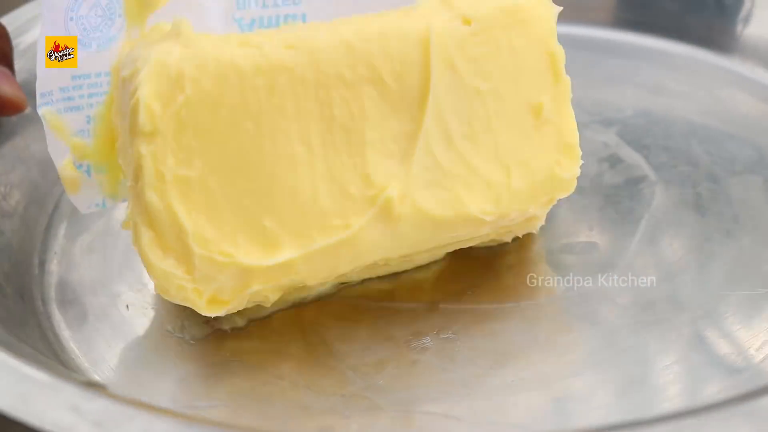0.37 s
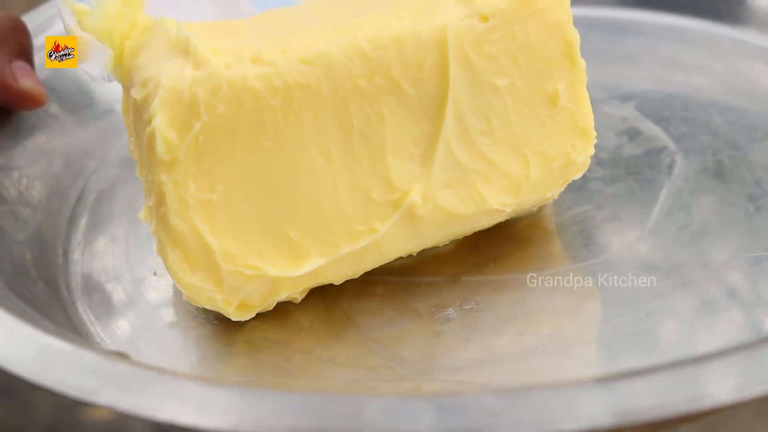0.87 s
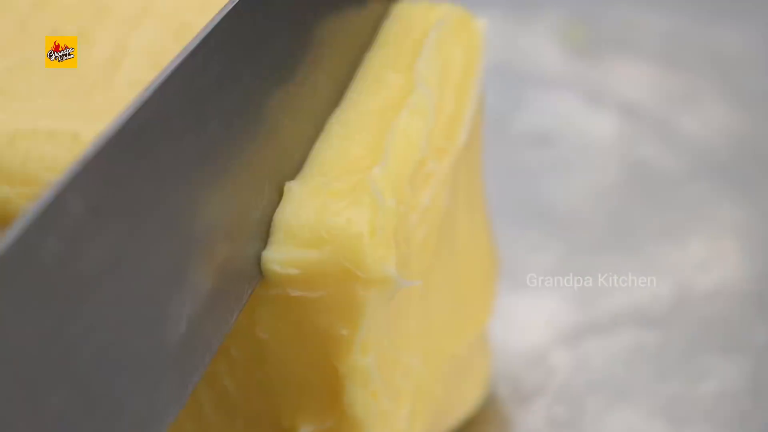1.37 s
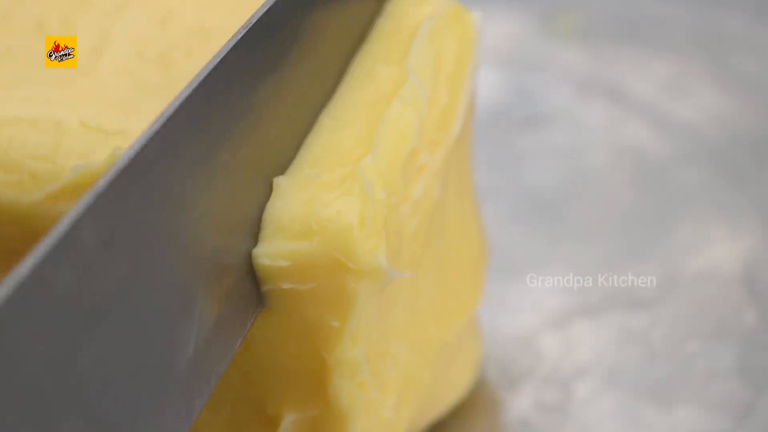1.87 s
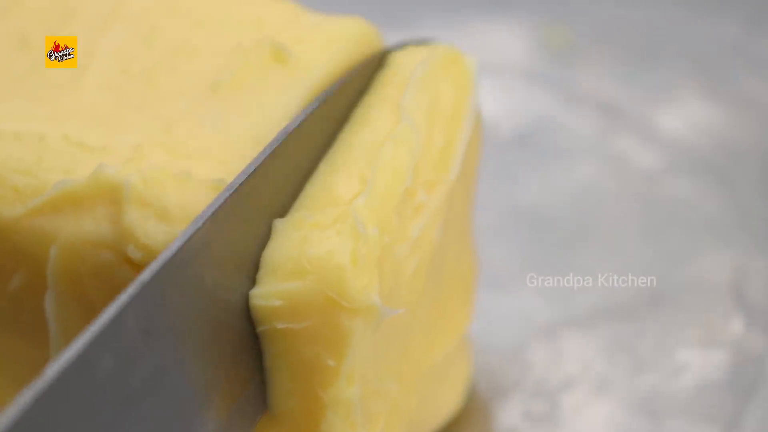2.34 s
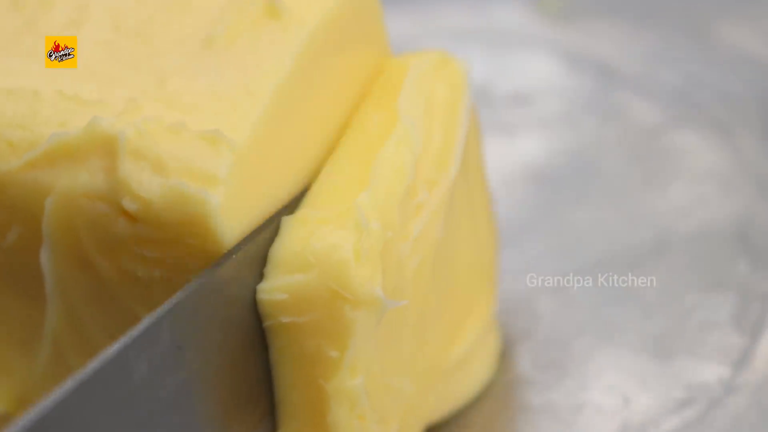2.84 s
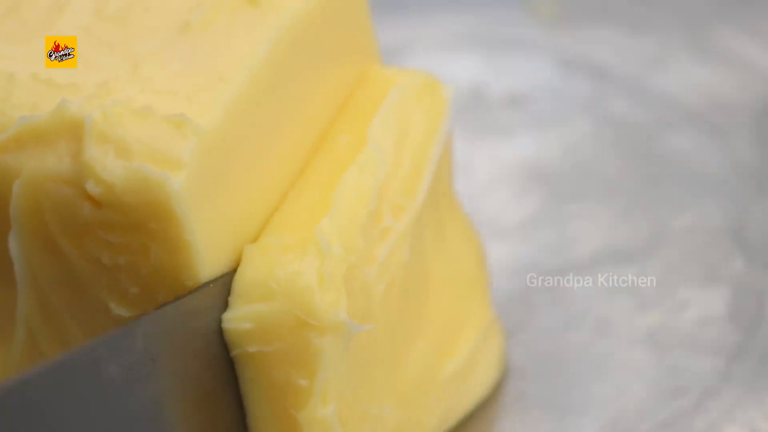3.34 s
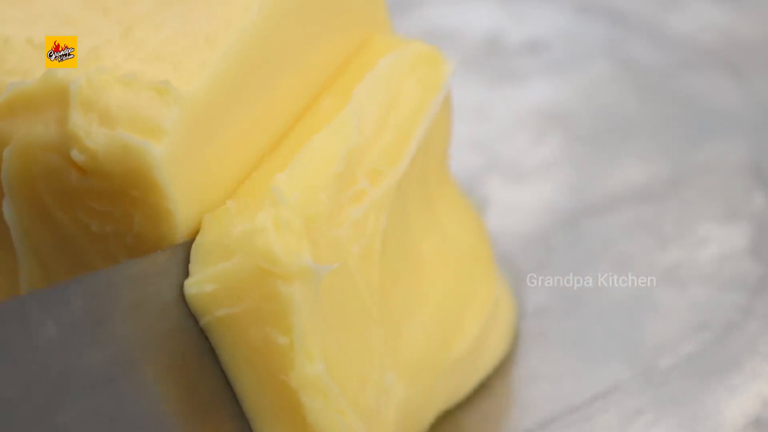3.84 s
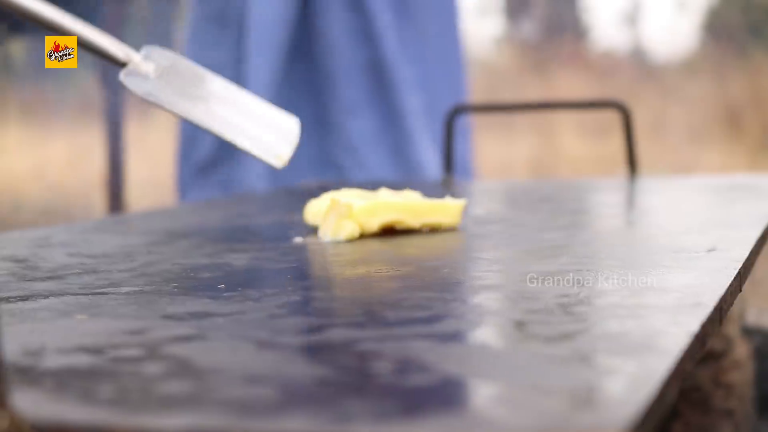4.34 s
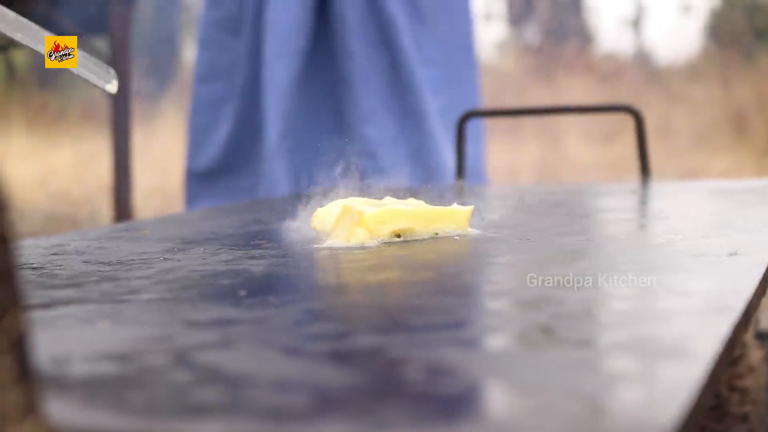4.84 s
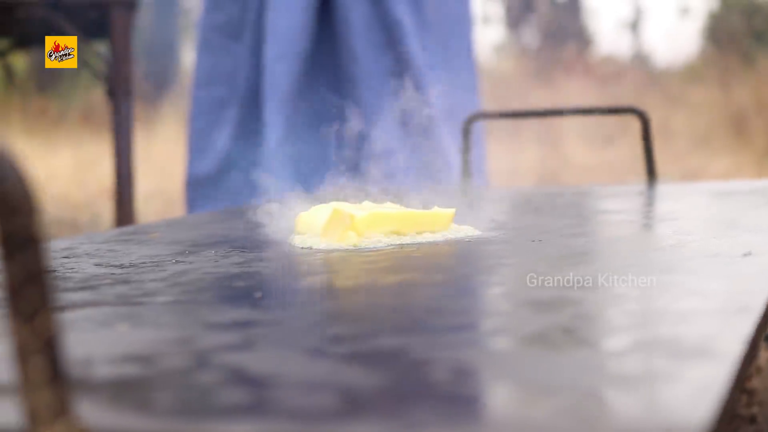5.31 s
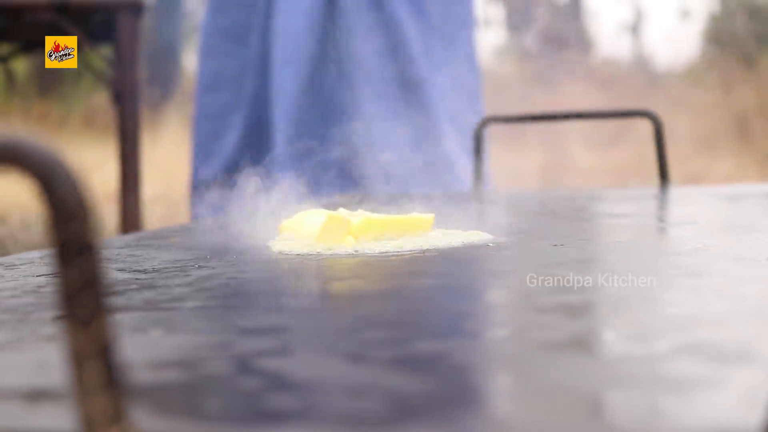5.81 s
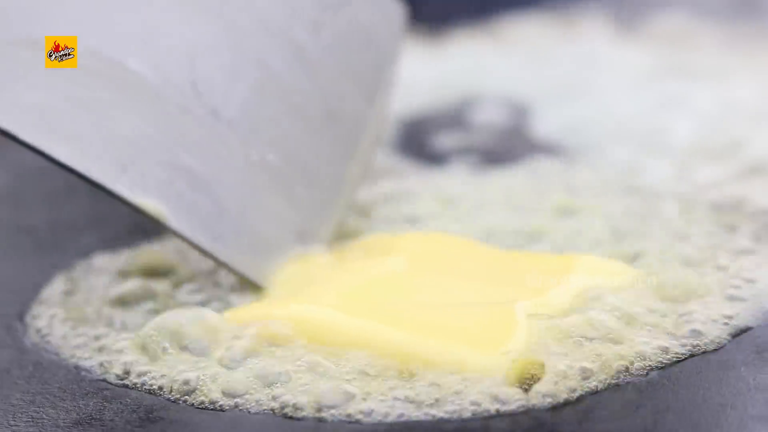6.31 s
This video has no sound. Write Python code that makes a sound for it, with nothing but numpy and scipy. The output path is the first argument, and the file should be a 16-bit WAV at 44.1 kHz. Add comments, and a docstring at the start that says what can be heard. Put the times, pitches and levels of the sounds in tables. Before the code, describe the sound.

Outdoors, closely miked in stereo. From 0 to 1.4 s a waxed wrapper crackles in dense, crisp, uneven snaps, busiest before 0.95 s and then thinning, while low wind buffets thump mostly on the right. At 1.4 s it cuts to a quiet breeze with leafy hiss and a faint distant engine drone until 3.3 s. Small dry ticks and very faint rising knife squeaks appear; a plate knocks dully from 2.5 s, more firmly at 2.85, with one very loud short clank at 3.17 and a faint knock at 4.14. A wavering bird whistle drops in pitch at about 3.1, 3.35, 3.65, 3.9 and 4.2 s, echoing softly. At 4.34 s bright, dense butter sizzling starts abruptly over fluttering fire rumble and low puffs; the passage restarts at 5.34. At 6.2 s the frying turns closer and fuller, with a hollow griddle hum under a scraper, until the end.

```python
"""A waxed wrapper crackles off a block of butter: creases slip and ring the sheet as wind buffets the microphone.
Then a knife squeaks through the block (stick-slip tones) and knocks on a steel plate (ringing modes) as a
whistled bird calls and a few small dry ticks fall. Next the butter sizzles on a griddle over a fire: dense clicks
for bursting water beads, rumble and puffs for the flames; its first second starts over once. Last, a close view of
the frying, where the griddle hums under a scraper. A breeze bed (banded noise) lies under wrapper and knife."""
import sys
import numpy as np
from scipy import signal
from scipy.io import wavfile

SR = 44100
rng = np.random.default_rng(int(sys.argv[2]) if len(sys.argv) > 2 else 0)


def int16_out(signal):
    """Quantize to a 16-bit WAV file."""
    q = np.round(np.clip(np.atleast_2d(signal).T, -1, 1) * 32767)
    wavfile.write(sys.argv[1], SR, q.astype(np.int16))


def gain_from_db(level_db):
    """Convert decibel levels to linear amplitude factors (20 dB per decade)."""
    decades = np.asarray(level_db, float) / 20
    return 10 ** decades


N = 283563

# where the knife, griddle and close view begin, and how long the repeated griddle passage is (s)
KNIFE_S, GRIDDLE_S, CLOSE_S, REPEAT_S = 1.405, 4.34, 6.205, 1.001
# stereo likeness of frying and fire: f/Hz, likeness of left and right (0-1)
FRY_LIKENESS = [(60, 0.46), (130, 1), (290, 0.87), (640, 0.75), (1410, 0.8), (3100, 0.95), (6820, 0.76),
                (15000, 0.35)]
# stereo balance of frying and fire: f/Hz, left over right/dB
FRY_BALANCE = [(60, 4), (180, -1), (550, 1.5), (1650, -1), (4970, -2.5), (15000, -5.5)]


def rms_one(x):
    """Scale to rms 1."""
    return x / np.sqrt(np.mean(x ** 2) + 1e-20)


def in_time(rows):
    """Read every column of a breakpoint curve at each sample."""
    s, *columns = np.transpose(rows)
    return [np.interp(np.arange(N) / SR, s, c) for c in columns]


def at_hz(points, hz):
    """Read a spectrum on a log frequency axis."""
    f, value = np.transpose(points)
    return np.interp(np.log(hz), np.log(f), value)


def sides(db):
    """Left and right gains for a left-over-right difference in dB; negative leans right."""
    return gain_from_db(np.array([db / 2, -db / 2]).reshape(2, -1))


def between(x, start_s, end_s):
    """Keep a sound between two times only, in stereo."""
    out, a, b = np.zeros((2, N)), round(start_s * SR), min(round(end_s * SR), N)
    out[:, a:b] = x[..., a:b]
    return out


def drift(rate_hz):
    """Slow random wander of rms 1: lowpassed noise made at one value per 40 samples."""
    r = np.exp(-80 * np.pi * rate_hz / SR)
    slow = signal.lfilter([1], [1, -2 * r, r * r], rng.standard_normal(N // 40 + 2002))[2000:]
    return np.interp(np.arange(N) / 40, np.arange(len(slow)), rms_one(slow))


def resonance(x, hz, width_hz):
    """One resonant peak of gain 1."""
    r = np.exp(-np.pi * width_hz / SR)
    poles = [1, -2 * r * np.cos(2 * np.pi * hz / SR), r * r]
    return signal.lfilter([(1 - r * r) / 2, 0, (r * r - 1) / 2], poles, x)


def grains(per_s, spread_db, shape):
    """Random clicks of either sign, a few of them much larger, at rms 1."""
    sizes = gain_from_db(spread_db * np.minimum(rng.exponential(1, shape), 5)) * rng.choice([-1, 1], shape)
    return rms_one(sizes * (rng.random(shape) < per_s / SR)) + 1e-18


def banded(source, spectrum, likeness, balance, patchy_db, gain_db, span):
    """Quarter-octave stereo bands inside a span, each patchy on its own; gain_db(hz) moves a band in time."""
    a, b = round(span[0] * SR), min(round(span[1] * SR), N)
    out, edges = np.zeros((2, N)), 25 * 2 ** np.arange(0, 9.6, .25)
    for k, (low, high) in enumerate(zip(edges, edges[1:])):
        hz = np.sqrt(low * high)
        band = signal.butter(2, [low, high], "band", fs=SR, output="sos")
        mid, side = signal.sosfilt(band, source[k % 2][:, a:b])
        alike = np.clip(at_hz(likeness, hz), -1, 1)
        level_db = at_hz(spectrum, hz) + gain_db(hz) + patchy_db * drift(16.6)
        gain = gain_from_db(level_db)[a:b] * sides(at_hz(balance, hz))
        out[:, a:b] += gain * (np.sqrt(1 + alike) * mid + np.sqrt(1 - alike) * side * [[1], [-1]])
    return out


def add(out, s, burst):
    """Mix a short burst in at a time."""
    at = round(s * SR)
    out[:, at:at + burst.shape[-1]] += burst[..., :N - at]


def wrapper_snaps():
    """Each crease buckles in a few quick slips that ring the waxed sheet; duller snaps ring longer."""
    # loudest snaps: t/s, body peak level/dB, crease pitch f/Hz, treble peak over body/dB
    snaps = [(.033, -16.5, 1650, -14), (0.042, -15.5, 2840, -10), (.064, -14, 2530, 3.5),
             (.092, -13.5, 1480, -7), (0.107, -13.5, 2100, -7), (0.117, -20, 1770, 3),
             (.139, -16, 1620, -15), (0.148, -8, 2750, 0.5), (.16, -11, 2490, 6.5),
             (0.166, -4.5, 2790, -10), (0.172, -11.5, 1620, -5), (.177, -16, 1770, 4),
             (0.187, -18, 1310, -26), (.2, -27, 1670, -8), (.213, -14, 3150, -8), (.221, -18, 2500, 2.5),
             (.247, -5, 2560, 2.5), (.265, -17, 1890, -5), (.272, -9, 1600, -9), (0.289, -11, 2560, -11),
             (.307, -9.5, 1550, -13), (.335, -10.5, 2100, -2.5), (.342, -15.5, 1770, -4),
             (.349, -8.5, 1800, -5.5), (0.364, -19.5, 1870, -3), (.387, -18, 1930, -14),
             (.394, -15, 1810, -4), (.403, -26, 1880, 6.5), (.426, -18.5, 1530, -18),
             (.459, -14.5, 1980, -8), (.476, -6.5, 1860, -0.5), (0.484, -12, 1050, -12),
             (.494, -14.5, 2490, -14), (.499, -15, 1360, -11), (0.517, -11, 1730, -4.5),
             (.531, -19, 1380, -18), (0.545, -15, 1290, -17), (0.553, -20, 1400, -1), (0.557, -20, 1810, 3),
             (0.58, -16.5, 1540, -8), (0.592, -20.5, 1820, 2), (.617, -2.5, 1650, -4), (.643, -28, 1200, 3),
             (.673, -16, 2030, -5), (.688, -12, 1860, -3), (0.696, -28, 1430, -16), (0.705, -30, 990, -10),
             (.72, -13, 1960, -7), (0.725, -4.5, 1030, 0.5), (.745, -8.5, 2110, 1), (.766, -18.5, 2040, 4),
             (0.779, -17.5, 1450, -7), (.787, -24.5, 1900, -5), (.81, -21.5, 1470, -27),
             (.82, -16.5, 2200, -5), (.836, -21.5, 1100, -14), (.843, -8, 1380, -7), (0.847, -15, 1380, -5),
             (0.856, -45, 1990, -20), (.864, -4.5, 2230, 0), (.878, -11.5, 1210, 3.5),
             (.887, -18, 2620, 11.5), (.921, -14, 2060, 1.5), (.925, -12.5, 2060, -6),
             (.932, -14.5, 1050, -2), (.948, -15, 1210, -4), (0.952, -15.5, 1200, -16),
             (0.968, -35, 1400, -9), (0.989, -21, 2050, -4.5), (.995, -18.5, 1550, -18),
             (1.009, -19, 1560, -28), (1.039, -22, 1620, -11), (1.072, -15.5, 3240, -2.5),
             (1.084, -19.5, 1800, -10), (1.094, -24.5, 1270, -20), (1.125, -32, 2410, -13),
             (1.208, -27.5, 1820, -14), (1.215, -24, 1440, -21), (1.233, -24, 2080, -8),
             (1.248, -22.5, 2730, 0.5), (1.263, -26.5, 2930, -8), (1.276, -33, 3030, -17),
             (1.283, -28.5, 2420, -2), (1.335, -24, 1310, -23), (1.368, -11, 2780, -5.5)]
    even_t60_s, longer_per_dull_db, ring_scatter_db = 0.0082, 0.45, 3.5   # ring time when body and treble match
    out, t = np.zeros((2, N)), np.arange(1500) / SR
    dull = signal.butter(3, [300, 5200], "band", fs=SR, output="sos")
    for s, db, hz, treble_db in snaps:
        ring_luck, pan_luck = rng.standard_normal(2)
        t60 = even_t60_s * gain_from_db(ring_scatter_db * ring_luck - longer_per_dull_db * treble_db)
        envelope = np.minimum(t / 0.00067, 1) * gain_from_db(-60 * t / max(t60, .003))
        slips = rng.standard_normal((3, t.size)) ** 3 * envelope   # cubing leaves a few large slips
        # one shared part plus one for each side; the treble is wider
        wide = slips[0] + 0.73 * slips[1:]
        narrow = slips[0] + 0.22 * slips[1:]
        body = resonance(narrow, hz, 0.5 * hz) + 0.047 * resonance(narrow, 2.5 * hz, hz)
        body = signal.sosfilt(dull, body + 0.5 * resonance(narrow, 910, 690))
        treble = resonance(wide, rng.uniform(6160, 8000), 1630) + 0.16 * resonance(wide, 9700, 2700)
        snap = body / np.abs(body).max() * sides(-1.5)
        snap = snap + gain_from_db(treble_db) * treble / np.abs(treble).max() * sides(-3)
        add(out, s, gain_from_db(db) * snap * sides(2.0 * pan_luck))
    return out


def wrapper_crackle():
    """Smaller creases give way in clumps of clicks that follow the handling."""
    # handling: t/s, fine crackle level/dB
    handling = [(0.0, -35.5), (.1, -30), (.5, -38), (.85, -35.5), (1.044, -46), (1.192, -52.5), (1.4, -67)]
    # crackle colour: f/Hz, relative level/dB
    colour = [(180, -38), (300, 3), (494, 0), (1080, 11), (2740, 0.5), (5610, -14), (6620, -13),
              (10400, -14.5), (16000, -45.5)]
    clumps = grains(350, 4.0, (1, 2, N)).repeat(2, axis=0) * gain_from_db(4.5 * drift(60))
    level_db, = in_time(handling)
    likeness, balance = [(600, 1.0), (15000, 0.091)], [(300, -3.5), (15000, 4)]
    return banded(clumps, colour, likeness, balance, 2.2, lambda hz: level_db, (0, KNIFE_S))


def knife_knocks():
    """A few ms of rattling contact strike the plate's decaying modes, unevenly from knock to knock."""
    # knocks: t/s, peak level/dB, hardness cut f/Hz, rattle time to -40 dB/s
    knocks = [(2.516, -28.5, 486, 0.0056), (2.646, -34.5, 1500, .005), (2.719, -35, 2000, 0.011),
              (2.845, -17, 5440, 0.009), (3.069, -28.5, 3000, 0.0053), (3.1742, -1, 5100, 0.018),
              (3.331, -30.5, 5000, 0.015), (3.481, -32, 6000, 0.0031), (4.137, -32.5, 2510, 0.014)]
    # steel plate modes: f/Hz, level/dB, t60/s
    plate = [(307, 8, 0.027), (452, -11.5, 0.049), (686, -17.5, 0.1), (886, 2, 0.0092), (1210, -7, 0.032),
             (1380, -12, 0.039), (1774, -24, 0.27), (1800, 2, 0.019), (2670, -10.5, 0.033),
             (3980, -16, 0.05), (4600, -27, 0.027), (5866, -12, 0.05), (6570, -11, 0.028),
             (7600, -10, 0.019), (8320, -5.5, 0.025)]
    out, t = np.zeros((2, N)), np.arange(6000) / SR
    for s, db, cut_hz, rattle_s in knocks:
        contact = rng.standard_normal(t.size) * gain_from_db(-40 * t / rattle_s)
        hardness = signal.butter(1, [300, min(cut_hz, 18000)], "band", fs=SR, output="sos")
        softening = signal.butter(1, min(3.0 * cut_hz, 18000), fs=SR, output="sos")
        contact = signal.sosfilt(softening, signal.sosfilt(hardness, contact))
        ring = 14.0 * signal.lfilter([1, -1], [1, -.95], contact)   # the contact heard directly
        for hz, mode_db, t60 in plate:
            r, w = gain_from_db(-60 / (t60 * SR)), 2 * np.pi * hz / SR
            struck = signal.lfilter([0, np.sin(w)], [1, -2 * r * np.cos(w), r * r], contact)
            ring = ring + gain_from_db(mode_db + rng.normal(0, 1.5)) * struck
        ring = signal.sosfilt(signal.butter(3, [230, 13000], "band", fs=SR, output="sos"), ring)
        add(out, s, gain_from_db(db) * ring / np.abs(ring).max() * sides(-.5))
    return out


def knife_squeaks():
    """The blade sticks and slips in the fat: four rising partials of uneven strength."""
    # squeaks: t/s, length/s, starting f/Hz, fundamental level/dB, gain per overtone/dB
    squeaks = [(1.711, 0.037, 1034, -47.5, -16), (2.409, 0.1, 1617, -48.5, -14),
               (2.461, 0.04, 1220, -46, -25), (2.715, 0.028, 678, -40.5, -13),
               (2.806, 0.026, 1025, -46, 3.5), (2.788, 0.11, 1023, -45, -40), (3.363, .085, 1870, -48, -30),
               (3.37, .07, 1560, -51, -30)]
    out = np.zeros((2, N))
    for s, length, hz, db, tilt_db in squeaks:
        u = np.arange(round(length * SR)) / SR
        uneven = gain_from_db(6.9 * drift(79)[:u.size])
        phase = 2 * np.pi * hz * u * (1 + 0.24 * u)
        tone = sum(gain_from_db(tilt_db * k) * np.sin((k + 1) * phase) for k in range(4))
        add(out, s, gain_from_db(db) * tone * uneven * np.sin(np.pi * u / length))
    return out


def frying(db, fizz_db, colour, span):
    """Thousands of water beads burst in the fat each second; fizz_db lifts the treble above 4 kHz."""
    beads = grains(9000, 1.63, (2, 2, N)) * gain_from_db(0.86 * drift(92))
    spit = grains(28, 3.2, N)   # larger pops, heard in all bands at once
    return banded(beads + .12 * spit, colour, FRY_LIKENESS, FRY_BALANCE, 0.43,
                  lambda hz: db + fizz_db * np.clip(np.log2(hz / 4000), 0, 1), span)


def fizz():
    """Gain in dB of the finest fizz: it starts strong, settles, and thins for a moment."""
    t = np.arange(N) / SR
    first_db = 4.5 * np.exp(-np.abs(t - GRIDDLE_S) / 0.043)
    thins_db = -3.5 * np.exp(-((t - 5.01) / .12) ** 2)
    return first_db + thins_db


def fire():
    """Flames rumble as fluttering low noise, and puff: low swelling tones that ring the griddle at 400 Hz."""
    # rumble colour: f/Hz, relative level/dB
    colour = [(15, -36), (25, 3), (124, -3), (180, -1.5), (292, -7), (420, -11), (650, -16), (1000, -11),
              (2000, -90)]
    # puffs under the griddle: t/s, level/dB, low pitch f/Hz, griddle ring over the low tone/dB
    puffs = [(4.34, -35.5, 234, -2), (4.499, -34, 78.1, -17), (4.699, -44, 129, 7), (4.755, -43.5, 130, 13),
             (4.854, -33.5, 182, -7), (4.929, -33, 125, -2.5), (4.995, -30, 160, -9),
             (5.024, -30, 59.2, -28), (5.048, -30.5, 188, -7), (5.12, -35, 75.4, -3.5),
             (5.154, -33, 90.7, -16), (5.22, -30, 181, -2), (5.299, -31, 172, -4.5)]
    flutter_db = 1.5 * drift(16)
    out = banded(rng.standard_normal((2, 2, N)), colour, FRY_LIKENESS, FRY_BALANCE, 1.33,
                 lambda hz: -27.5 + flutter_db, (GRIDDLE_S, N / SR))
    t = np.arange(3000) / SR
    swell = t / 0.0088 * np.exp(1 - t / 0.0057)
    for s, db, hz, ring_db in puffs:
        puff = np.sin(2 * np.pi * hz * t) + gain_from_db(ring_db) * np.sin(2 * np.pi * 400 * t)
        add(out, s, gain_from_db(db) * swell * puff)
    return out


def griddle_hum():
    """The scraper's rubbing noise drives the sheet's low resonances."""
    # hum resonances: f/Hz, width/Hz, rms level/dB
    modes = [(382, 45, -38.5), (773, 24, -53)]
    rub, hum = rng.standard_normal(N), 0
    for hz, width_hz, db in modes:
        hum = hum + gain_from_db(db) * rms_one(resonance(resonance(rub, hz, width_hz), hz, 2 * width_hz))
    return between(hum, CLOSE_S, N / SR)


def bird():
    """A wavering whistle holds and drops, gains an octave on its high note, and is smeared by echoes from trees."""
    # calls: start t/s, high note f/Hz, low note f/Hz, end of hold after start/s, high note level/dB
    calls = [(3.094, 4520, 3030, 0.035, -49.5), (3.355, 4375, 3050, 0.051, -45),
             (3.647, 4350, 3060, 0.037, -47.5), (3.897, 3980, 2970, 0.034, -47.5),
             (4.198, 4250, 2470, .02, -44.5)]
    attack_s, drop_s, tail_s, sag_hz_per_s = 0.019, 0.023, 0.084, 2550
    scoop_hz = 130   # the note starts this far under its pitch
    song, waver, flutter = np.zeros(N), 1 + .011 * drift(250), gain_from_db(3.5 * drift(140))
    for s, high_hz, low_hz, hold_s, top_db in calls:
        low_s = s + hold_s + drop_s
        # t/s, f/Hz, level over the high note/dB
        hz, db = in_time([(s, high_hz - scoop_hz, -7), (s + attack_s, high_hz, 0), (s + hold_s, high_hz, 0),
                          (low_s, low_hz, 0.5), (low_s + tail_s, low_hz - sag_hz_per_s * tail_s, -10)])
        phase = 2 * np.pi * np.cumsum(hz * waver) / SR
        octave = .22 * np.clip(hz / 500 - 7, 0, 1)   # fades in from 3500 to 4000 Hz
        whistle = np.sin(phase) + octave * np.sin(2 * phase)
        song += between(gain_from_db(top_db + db) * flutter * whistle, s, low_s + tail_s)[0]
    t = np.arange(16000) / SR
    echoes = rms_one(rng.standard_normal((2, t.size))) * gain_from_db(-29 - 60 * t / 0.34)   # t60 0.34 s
    wet = signal.fftconvolve(song[None], echoes, axes=1)[:, :N]
    return between(song * sides(-2.4) + wet, 0, GRIDDLE_S)


def wind():
    """Lumpy low turbulence, mostly its own on each microphone port, with single decaying buffets."""
    # gusts: t/s, level before panning/dB
    gusts = [(0.0, -31), (0.182, -45), (0.214, -34), (0.24, -42), (0.67, -25), (0.794, -34), (0.85, -28.5),
             (0.88, -50), (0.942, -34.5), (1.246, -40), (1.29, -33.5), (1.4, -34.5)]
    # buffets: t/s, level before panning and decay/dB, f/Hz
    buffets = [(.014, -20.5, 110), (0.488, -19, 130), (0.55, -20, 90), (0.65, -11, 180), (.705, -26, 110),
               (.774, -18, 119), (.813, -17, 164), (.845, -19, 100), (.96, -25, 150), (1.055, -25.5, 140),
               (1.16, -23, 110), (1.288, -14, 170), (1.326, -17, 157), (1.361, -24, 168)]
    pan_db, veer_db = -14, 1.5   # left over right: the right port is exposed
    gust_db, = in_time(gusts)
    eddies = rng.standard_normal((2, N)) * gain_from_db([6.8 * drift(11), 3.3 * drift(22.5)])
    eddies = signal.sosfilt(signal.butter(2, [40, 180], "band", fs=SR, output="sos"), eddies)
    turbulence = rms_one(eddies + 0.17 * eddies[::-1])
    out = gain_from_db(gust_db) * sides(pan_db + veer_db * drift(8)) * turbulence
    t = np.arange(2600) / SR
    for s, db, hz in buffets:
        add(out, s, gain_from_db(db) * sides(pan_db) * np.sin(2 * np.pi * hz * t) * np.exp(-1.8 * hz * t))
    return between(out, 0, KNIFE_S)


def ticks():
    """A few small dry ticks near the knife: short bright bursts of resonant noise."""
    # ticks: t/s, peak level before panning/dB, f/Hz
    dry_ticks = [(1.427, -33.5, 7400), (1.708, -38, 7000), (1.903, -41, 7200), (2.757, -39, 9500),
                 (2.939, -35, 9000), (3.384, -31, 6500), (3.405, -31.5, 7100), (3.68, -40, 7950)]
    out, t = np.zeros((2, N)), np.arange(900) / SR
    for s, db, hz in dry_ticks:
        tick = resonance(rng.standard_normal((2, t.size)) * gain_from_db(-60 * t / 0.036), hz, .5 * hz)
        add(out, s, gain_from_db(db) * tick / np.abs(tick).max() * sides(-9.0))
    return out


def air():
    """Hum of the land, rustle and leaf hiss follow the breeze, fainter by the wrapper; a far engine drones."""
    # breeze in the nearby growth: t/s, rustle over its resting level/dB
    rustle = [(1.41, 4), (2.0, 0), (2.35, 0.5), (2.75, 4.5), (3.25, 1), (3.39, 7.5), (3.55, 6.5),
              (3.72, 10), (3.95, 4), (4.15, 7.5), (4.33, 2.5)]
    # colour: f/Hz, relative level/dB
    colour = [(15, -40), (25, -9), (100, -10.5), (250, -9.5), (460, -13), (700, -11.5), (1330, -14.5),
              (2500, -17), (4100, -22.5), (4900, -38), (5700, -23), (7500, -23.5), (11000, -29),
              (16000, -40)]
    # stereo likeness: f/Hz, likeness of left and right (-1 to 1)
    likeness = [(60, 0.88), (130, 0.9), (290, 0.9), (640, 0.73), (1410, 0.17), (3100, -0.49),
                (6820, -0.052), (15000, -0.074)]
    # stereo balance: f/Hz, left over right/dB
    balance = [(60, -1.5), (240, 1.5), (950, 0), (3770, -3.5), (15000, -5.5)]
    # far engine: f/Hz, width/Hz, rms level/dB
    engine = [(165, 15, -58), (251, 4.2, -55)]
    breeze_db, = in_time(rustle)
    by_wrapper = np.arange(N) < KNIFE_S * SR
    base_db = np.where(by_wrapper, -35.5, -31)
    hum_db = 7 + 0.31 * breeze_db   # below 500 Hz
    hiss_db = np.where(by_wrapper, 5.5, 3.5 + 0.18 * breeze_db)   # from 4500 Hz up
    noise = rng.standard_normal((2, 2, N))

    def level_db(hz):
        """Base level plus the movement of hum, rustle or hiss."""
        return base_db + (hum_db if hz < 500 else breeze_db if hz < 4500 else hiss_db)

    bed = banded(noise, colour, likeness, balance, 1.0, level_db, (0, GRIDDLE_S))
    drone = sum(gain_from_db(db) * rms_one(resonance(noise[0, 1], hz, width_hz)) for hz, width_hz, db in engine)
    return bed + between(drone, KNIFE_S, 3.3)


def scene():
    """Wrapper, knife, griddle and close view in turn; the griddle's first second starts over once."""
    # vigour of the frying in its first second: t/s, level/dB
    vigour = [(4.345, -22.5), (4.5, -22), (4.815, -19.5), (5.0, -21.5), (5.185, -20), (5.34, -21)]
    # frying colours, one for the griddle and one for the close view: f/Hz, relative level/dB
    fry_colours = [(240, -39), (400, -15.5), (562, -22), (949, -17), (1230, -12), (1420, -12.5), (3070, -1),
                   (3750, -0.5), (5110, -4), (5690, 1), (6950, -1.5), (8500, -1.5), (13500, -9.5),
                   (15300, -9.5), (16000, -25)], [(240, -48), (400, 4.5), (453, -22), (687, -15.5),
                   (789, -11), (852, -14), (1270, -9.5), (1820, -7.5), (3530, 3), (4730, -2), (8900, -2.5),
                   (14600, -12), (16000, -9)]
    flames = fire()
    sizzle = frying(*in_time(vigour), fizz(), fry_colours[0], (GRIDDLE_S, CLOSE_S))
    once = between(flames + sizzle, GRIDDLE_S, GRIDDLE_S + REPEAT_S)
    again = np.roll(once, round(REPEAT_S * SR), axis=1)
    griddle = between(once + again, GRIDDLE_S, CLOSE_S)   # the second pass is cut short
    close = frying(-20, 0, fry_colours[1], (CLOSE_S, N / SR)) + griddle_hum()
    close = close + between(flames, CLOSE_S, N / SR)
    foreground = wrapper_snaps() + wrapper_crackle() + knife_knocks() + knife_squeaks() + griddle + close
    return foreground + bird() + wind() + ticks() + air()


def band_limit(x):
    """A steep low-pass at the top of the band."""
    return signal.sosfilt(signal.butter(12, 16480, fs=SR, output="sos"), x)


def record(dry):
    """A narrow dip near 5 kHz colours the whole mix, the top is cut, and peaks flatten at full scale."""
    coloured = dry - 0.13 * resonance(dry, 4970, 370)
    top_cut = signal.ellip(10, .5, 60, 15720, fs=SR, output="sos")
    mix = np.clip(signal.sosfilt(top_cut, coloured), -1, 1)
    return band_limit(mix)


dry = scene()
out = record(dry)
int16_out(out)
```